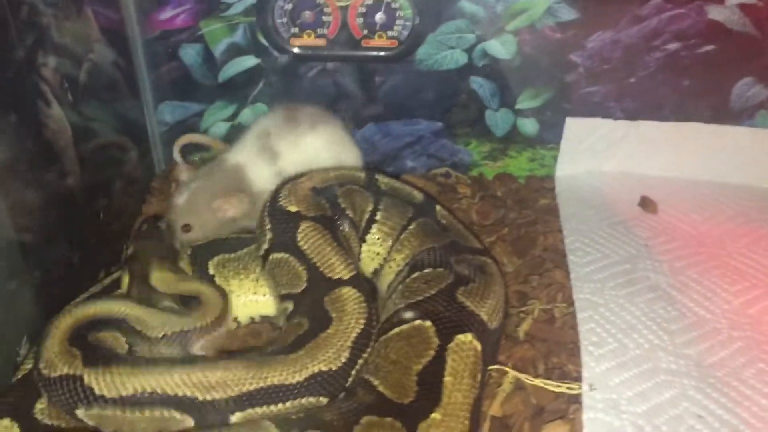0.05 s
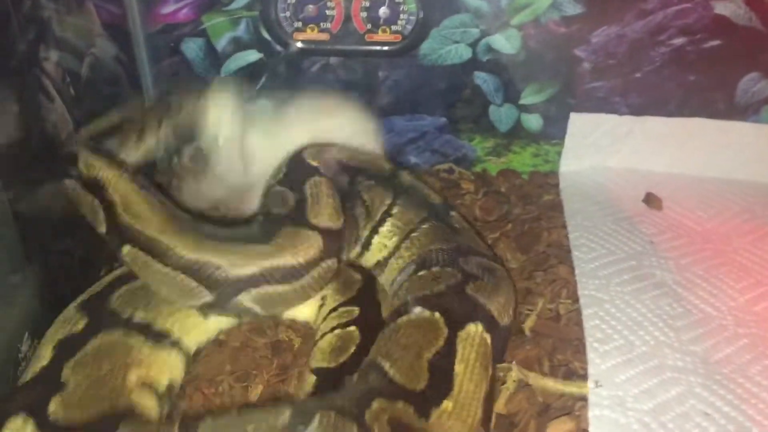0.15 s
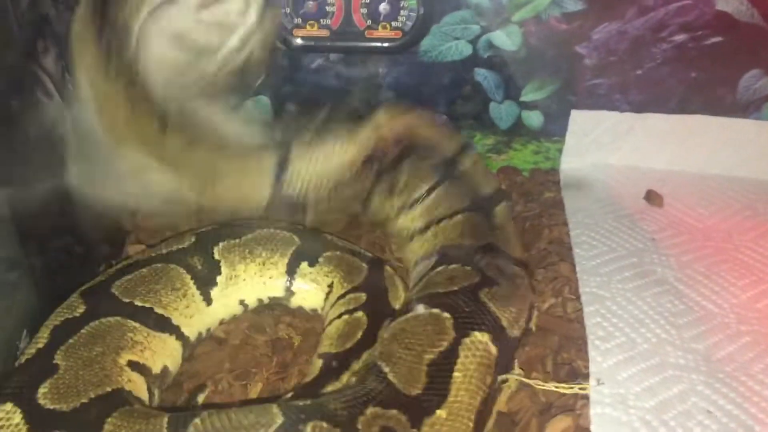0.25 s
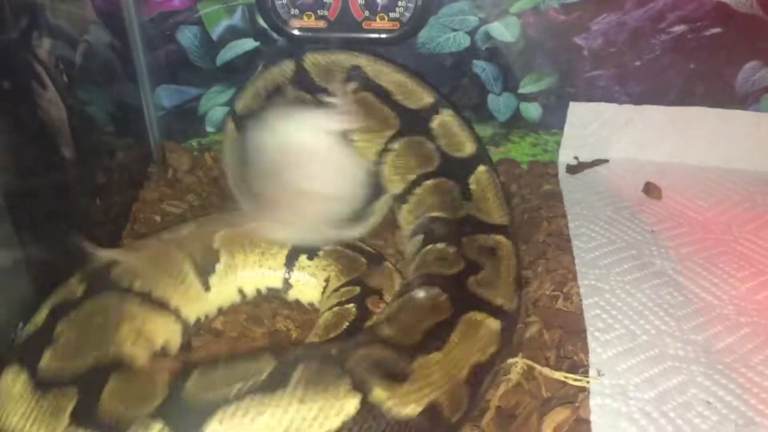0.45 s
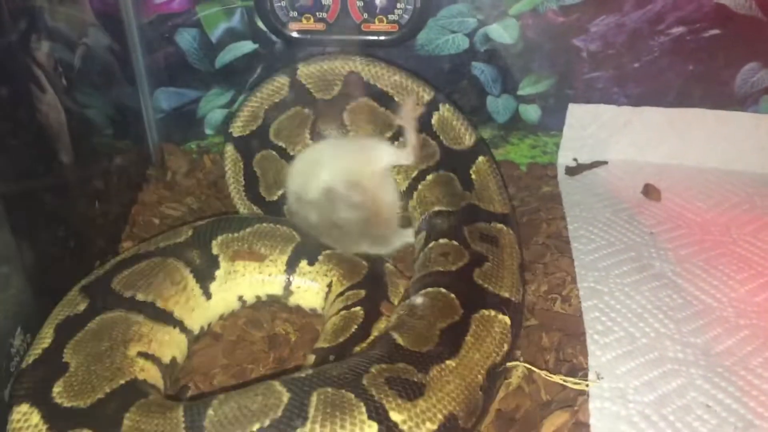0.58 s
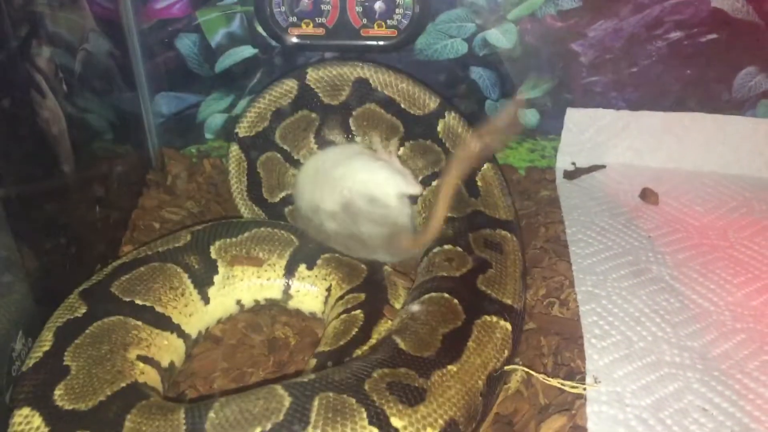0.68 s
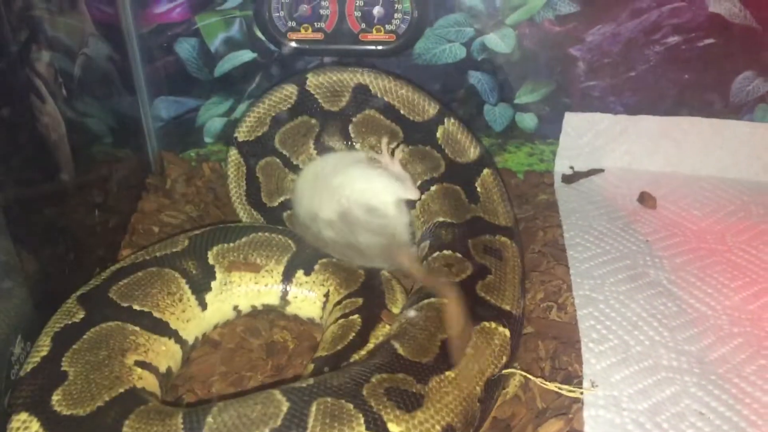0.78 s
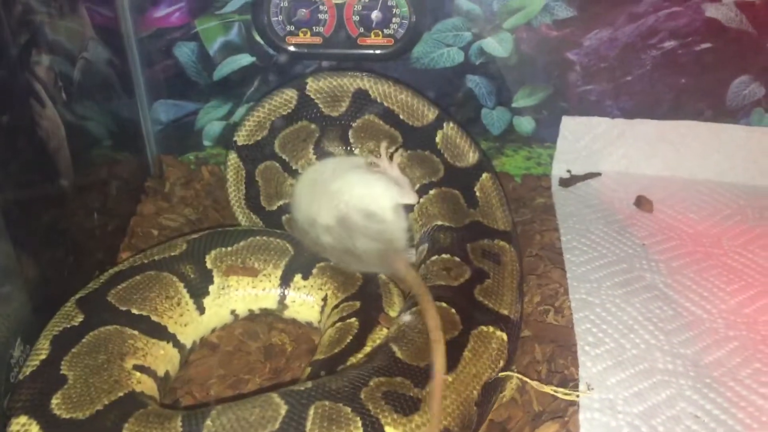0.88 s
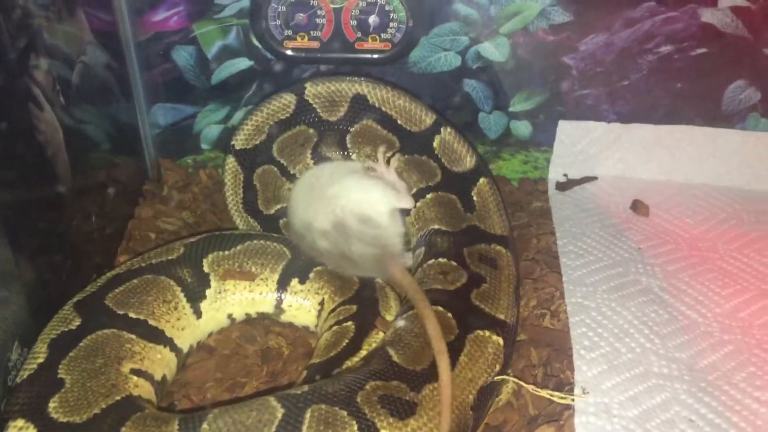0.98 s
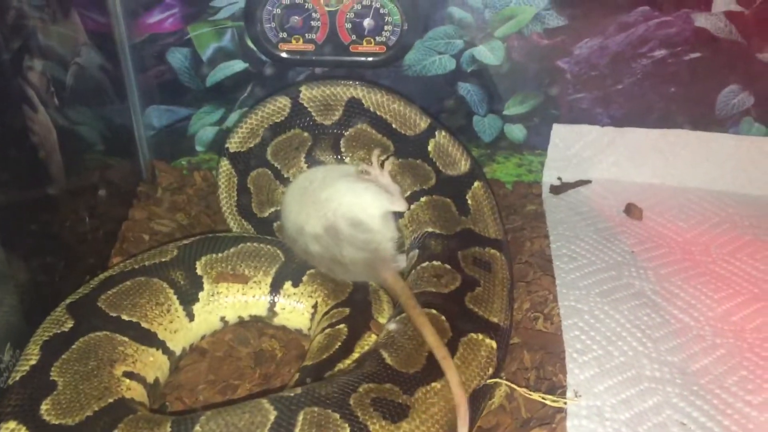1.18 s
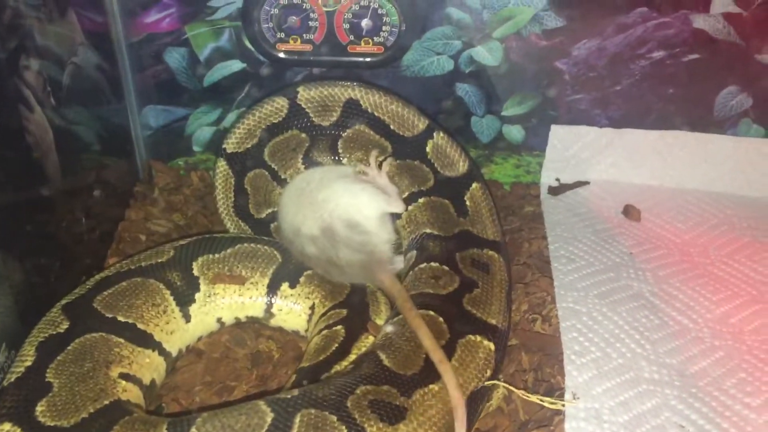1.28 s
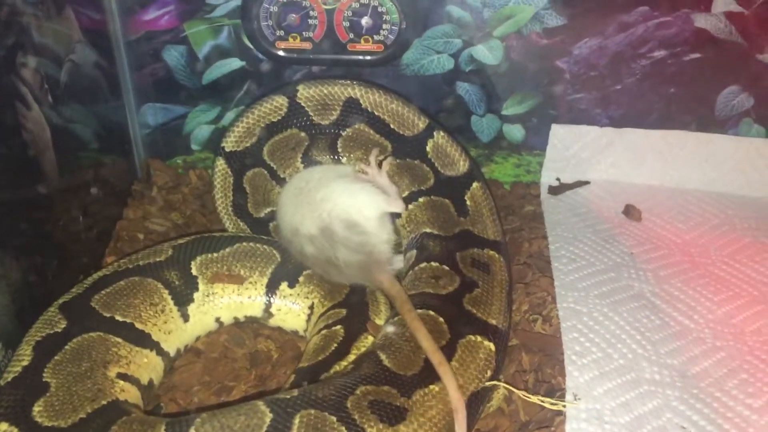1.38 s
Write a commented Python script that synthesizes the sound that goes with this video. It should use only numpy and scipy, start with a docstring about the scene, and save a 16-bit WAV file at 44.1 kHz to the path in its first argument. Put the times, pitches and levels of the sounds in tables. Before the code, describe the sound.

A striking snake knocks hard against its tank wall, then settles on rustling bark.

```python
"""Over a quiet room hum, scales brush on bark and a tank floor thuds: a python strikes a rodent.
Up close, its body knocks hard against a wall, ringing the panel and the whole small tank and
scattering bark. It drops onto the bedding with dull pats and low bumps, and the chips rustle
and tick as the coils close. A short echo follows every move."""
import sys
import numpy as np
from scipy import signal
from scipy.fft import rfft, irfft
from scipy.io import wavfile
from scipy.ndimage import map_coordinates

SR = 44100
rng = np.random.default_rng(int(sys.argv[2]) if len(sys.argv) > 2 else 0)


def wav_record(signal):
    """Record a signal, one row per channel, as 16-bit PCM in the file named by sys.argv[1]."""
    frames = np.transpose(np.atleast_2d(signal))
    bounded = np.clip(frames, -1, 1)
    # unit amplitude maps onto the largest positive 16-bit level
    quanta = np.round(bounded * 32767).astype(np.int16)
    wavfile.write(sys.argv[1], SR, quanta)


N = 63945


def undb(db):
    """Decibels to gain."""
    return 10 ** (np.asarray(db) / 20)


def since(start):
    """Seconds since a moment, zero before it."""
    return np.maximum(np.arange(N) / SR - start, 0)


def fade(start, t60):
    """Sudden onset and exponential decay, 60 dB down after t60 seconds."""
    age = since(start)
    return (age > 0) * np.exp(-np.log(1000) * age / t60)


def convolve(x, response):
    """Pass a sound through a response."""
    return signal.fftconvolve(x, response)[:N]


def low_cut(x, hz, order=2):
    """Roll off the bass."""
    return signal.sosfilt(signal.butter(order, hz, "high", fs=SR, output="sos"), x)


def colour(x, points, size=4096):
    """Minimum-phase EQ through (Hz, dB) points; keeps the power of white noise."""
    hz, db = np.array(points).T
    grid = np.maximum(np.fft.rfftfreq(size, 1 / SR), 1)
    gain = undb(np.interp(np.log(grid), np.log(hz), db))
    cepstrum = irfft(np.log(gain))
    cepstrum[1:size // 2] *= 2
    cepstrum[size // 2 + 1:] = 0
    response = irfft(np.exp(rfft(cepstrum)))
    return convolve(x, response / np.linalg.norm(response))


def walk(per_s):
    """Smooth random drift with a spread near 1."""
    steps = rng.standard_normal(N)
    return map_coordinates(steps, [since(0) * per_s], order=2, mode="mirror")


def grains(per_s, spread_db):
    """Dense tiny clicks of uneven size, rms 1."""
    clicks = (rng.random(N) < per_s / SR) * rng.standard_normal(N)
    clicks *= undb(spread_db * rng.exponential(size=N))
    return clicks / np.sqrt(np.mean(clicks ** 2))


def bursts(events, eq):
    """Short crunches of noise that share one colour."""
    envelope = sum(undb(db) * fade(start, t60) for start, db, t60 in events)
    return colour(envelope * rng.standard_normal(N), eq)


def pushes(blows):
    """Force of blows: a softer contact gives a longer, duller push."""
    force = np.zeros(N)
    for start, db, contact in blows:
        age = since(start)
        push = age * np.exp(-age / contact)
        force += undb(db) * push / push.sum()
    return force


def ring(modes, alternate=True):
    """Decaying modes; neighbours swing against each other, or together right at the contact."""
    sign = -1 if alternate else 1
    return sum(sign ** k * undb(db) * fade(0, t60) * np.sin(2 * np.pi * hz * since(0))
               for k, (hz, db, t60) in enumerate(modes))


# EQ of the room air (frequency [Hz], gain [dB])
AIR_EQ = [(25, -18), (45, -12), (60, 5.5), (110, 4), (300, 0), (450, -5.5), (690, 0), (1000, -5),
          (1300, -5.5), (1860, -11), (2150, -5), (2700, -14.5), (4200, -17), (5500, -22.5), (9000, -24.5),
          (11000, -28.5), (15500, -27)]
# EQ of the midrange drone (frequency [Hz], gain [dB])
DRONE_EQ = [(60, -14.5), (110, 2), (200, -1.5), (300, -5.5), (450, -12), (690, -3), (840, 8), (920, -16.5),
            (1030, 6), (1230, -21), (1550, -20), (1740, -21), (1900, -18.5), (4000, -38)]
# fan tones (frequency [Hz], rms level [dB])
FAN_TONES = [(53.5, -66.5), (159, -71), (371, -72.5), (543, -73), (741, -73), (828, -72), (1028, -74),
             (1362, -78)]

def room_tone(drift_rad=0.43, waver_db=1.6):
    """The bed: steady air, a wavering drone and the hum of a distant fan."""
    air = colour(rng.standard_normal(N), AIR_EQ) * undb(-63.5)
    drone = colour(rng.standard_normal(N), DRONE_EQ) * undb(-65 - waver_db * walk(per_s=10))
    hum = 0
    for hz, db in FAN_TONES:
        phase = 2 * np.pi * (hz * since(0) + rng.random()) + drift_rad * walk(per_s=6)
        hum += np.sqrt(2) * undb(db) * np.sin(phase)
    return air + drone + hum


# background tones (peak time [s], pitch [Hz], level [dB], half-width [s])
SWELL_TONES = [(.78, 840, -61, .018), (1.0, 374, -58.5, 0.018), (1.004, 1020, -64.5, 0.0091),
               (1.137, 830, -57.5, 0.0037), (1.225, 825, -57, 0.02), (1.334, 1024, -52.5, .013)]

def swells(drift_rad=0.8):
    """Faint, unsteady midrange tones rise briefly out of the bed."""
    t, out = since(0), 0
    for peak, hz, db, width in SWELL_TONES:
        envelope = undb(db) * np.exp(-.5 * ((t - peak) / width) ** 2)
        phase = 2 * np.pi * hz * t + drift_rad * walk(per_s=100)
        out += envelope * np.sin(phase)
    return out


# EQ of the echo tail (frequency [Hz], gain [dB])
ECHO_EQ = [(150, -1.5), (500, -1.5), (1000, -1), (2000, -4), (2800, -5.5), (4000, -4), (6500, -6.5),
           (14000, -1)]

def tank_echo(x, wet_db=-14.5, build_s=0.0056):
    """Dense reflections in and around the tank build quickly and die away."""
    tail = rng.standard_normal(N) * fade(0, t60=0.33) * (1 - np.exp(-since(0) / build_s))
    return undb(wet_db) * convolve(x, colour(tail / np.linalg.norm(tail), ECHO_EQ))


# fader ride of the slide (time [s], level [dB])
SLIDE_LEVELS = [(.165, -60.5), (.2, -47.5), (.24, -47), (.3, -49), (.325, -57.5), (.41, -56), (.45, -56),
                (.54, -51), (.62, -60.5), (.7, -63), (.76, -63.5)]
# EQ of scales on bark (frequency [Hz], gain [dB])
SCALE_EQ = [(120, 3), (400, 4), (700, 6.5), (1100, 7), (1350, -9), (1700, 2.5), (2100, -14.5),
            (4200, -17.5), (6000, -24), (8000, -37), (15000, -48)]

def scale_slide():
    """Scales catch on the bark in tiny grains that blur into a rustle."""
    times, db = np.array(SLIDE_LEVELS).T
    envelope = undb(np.interp(since(0), times, db))
    return colour(grains(per_s=9000, spread_db=1.26) * envelope, SCALE_EQ)


# single chip ticks (time [s], level [dB], t60 [s])
CHIP_TICKS = [(.2095, -48.5, 0.019), (.298, -56, 0.029), (.361, -30, 0.029), (.408, -51, 0.041),
              (.428, -54, .03), (.494, -57.5, 0.028), (.519, -65, 0.022), (.548, -61.5, .03),
              (.614, -61.5, .02), (.633, -63, 0.012)]
# EQ of a tick (frequency [Hz], gain [dB])
CHIP_EQ = [(500, -4), (2000, -8.5), (3600, 6.5), (4800, 0.5), (5800, 4), (7000, -9), (9500, -13.5),
           (11500, -20), (15000, -26)]
# EQ of scattering bark (frequency [Hz], gain [dB])
SCATTER_EQ = [(300, -18), (1000, 3), (1800, 1.5), (2600, -1), (4200, -17.5), (5200, -6.5), (7000, -16.5),
              (9000, -23), (15000, -39)]

def bark_chips():
    """Chips tick crisply one by one, and scatter in a fading spray after the knock."""
    scatter = grains(per_s=4000, spread_db=2) * undb(-44) * fade(start=0.355, t60=0.32)
    return bursts(CHIP_TICKS, CHIP_EQ) + colour(scatter, SCATTER_EQ)


# the body lands (time [s], level [dB], t60 [s])
BODY_PATS = [(.468, -35.5, 0.053), (.476, -38, 0.13), (.5165, -41.5, 0.077), (.572, -53.5, 0.3),
             (.613, -46.5, 0.063), (.658, -55.5, 0.36)]
# muffled EQ of the bedding (frequency [Hz], gain [dB])
BEDDING_EQ = [(80, -12), (200, 1), (400, -2.5), (750, -2.5), (1100, -4.5), (1400, -16.5), (1700, -21),
              (2100, -23), (4000, -43), (12000, -65)]
# the coils settle (time [s], starting pitch [Hz], level [dB], t60 [s])
COIL_BUMPS = [(0.472, 274.5, -43, 0.12), (.497, 214, -40.5, 0.103), (0.525, 179.4, -40, 0.13),
              (0.569, 182, -50, 0.28), (0.624, 110, -45, .09), (0.657, 89.5, -44.5, 0.081)]

def landing(attack_s=0.0011, sag_per_s=2.5):
    """The body pats onto the bedding; the coils settle in low bumps that sag in pitch."""
    out = bursts(BODY_PATS, BEDDING_EQ)
    for start, hz, db, t60 in COIL_BUMPS:
        age = since(start)
        envelope = undb(db) * fade(start, t60) * (1 - np.exp(-age / attack_s))
        cycles = hz * (1 - np.exp(-sag_per_s * age)) / sag_per_s
        out += envelope * np.sin(2 * np.pi * cycles)
    return out


TANK_LOW_HZ = 105  # the small panels radiate little below this
# soft blows on the floor (time [s], level [dB], contact time [s])
FLOOR_THUDS = [(.2235, -2, 0.00071), (.2305, -1.5, 0.00039), (.2515, -3, 0.0017), (.2725, -15, 0.00063)]
# floor resonances (frequency [Hz], level [dB], t60 [s])
FLOOR_RING = [(140, -31, .24), (186, -25, 0.12), (292.8, -30, .16), (474, -44, 0.21)]

def lunge():
    """The body pushes off and the tank floor booms."""
    return low_cut(convolve(pushes(FLOOR_THUDS), ring(FLOOR_RING)), TANK_LOW_HZ)


# hard blows on the wall (time [s], level [dB], contact time [s])
WALL_KNOCKS = [(.344, -3, 0.00011), (.348, 1, 0.000017)]
# bright wall resonances (frequency [Hz], level [dB], t60 [s])
WALL_RING = [(781, -31.5, .03), (975, -23, .035), (1065, -37, 0.13), (1240, -27.5, 0.052),
             (1511, -32.5, 0.074), (1720, -23, 0.012), (1745, -19.5, 0.04), (2070, -25.5, .022),
             (2344, -22, 0.034), (2747, -28, 0.015), (3037, -14.5, 0.015), (3165, -22, 0.017),
             (3685, -25, 0.023), (4060, -17, 0.014), (4426, -15, 0.012)]
# low resonances of the whole tank (frequency [Hz], level [dB], t60 [s])
TANK_RING = [(142.6, -26, 0.274), (175.5, -31, 0.11), (288.6, -21.5, 0.16), (316, -22.5, 0.04),
             (482, -32, .12), (541, -34, 0.105), (601.7, -22.5, .08)]
# EQ of the knock's crack (frequency [Hz], gain [dB])
CRACK_EQ = [(120, -50.5), (300, -24.5), (700, -18), (1000, -7), (1400, 0.5), (2500, -5), (3300, 1.5),
            (4700, 3.5), (5300, -9), (8000, -13), (15000, -27)]

def strike(wall_low_hz=844, wall_top_hz=4400, crack_db=-23, crack_t60_s=0.028):
    """The main hit: a double knock cracks on the wall and sets the whole tank booming."""
    wall = low_cut(ring(WALL_RING, alternate=False), wall_low_hz)
    wall = signal.sosfilt(signal.butter(6, wall_top_hz, fs=SR, output="sos"), wall)
    boom = low_cut(ring(TANK_RING), TANK_LOW_HZ)
    crack = bursts([(0, crack_db, crack_t60_s)], CRACK_EQ)
    return convolve(pushes(WALL_KNOCKS), wall + boom + crack)


def scene():
    """Mono mix: the snake and its echo up front, the room behind."""
    snake = lunge() + strike() + landing() + scale_slide() + bark_chips()
    return (snake + tank_echo(snake) + room_tone() + swells())[None]


def record(dry):
    """The recorder cuts the deepest bass and the very top."""
    top_cut = signal.ellip(10, .2, 70, 15650, fs=SR, output="sos")
    return signal.sosfilt(top_cut, low_cut(dry, hz=50, order=4))


dry = scene()
out = record(dry)
wav_record(out)
```